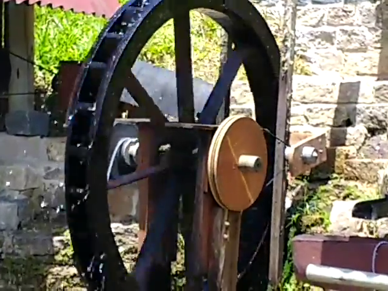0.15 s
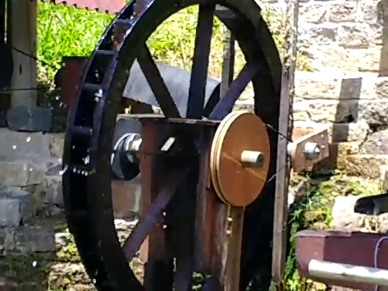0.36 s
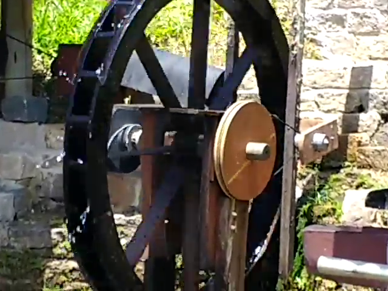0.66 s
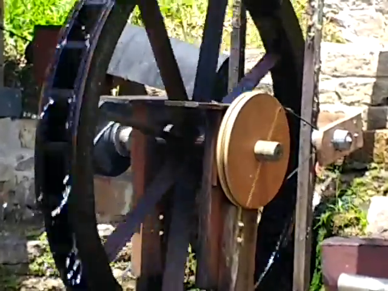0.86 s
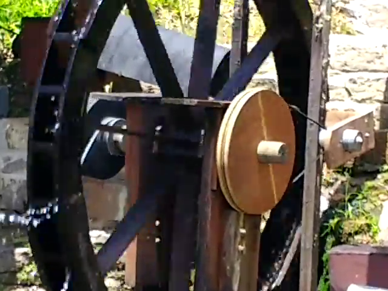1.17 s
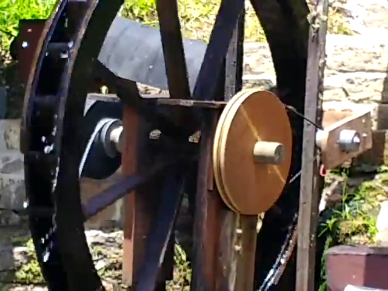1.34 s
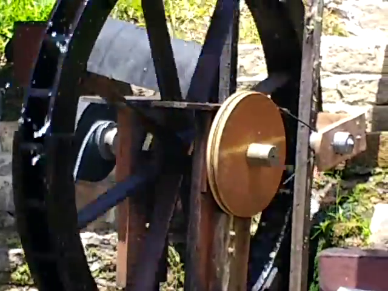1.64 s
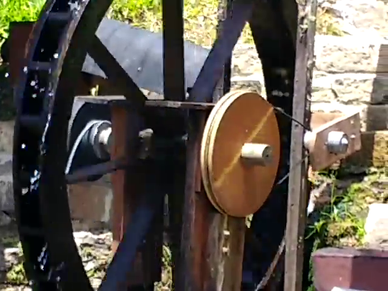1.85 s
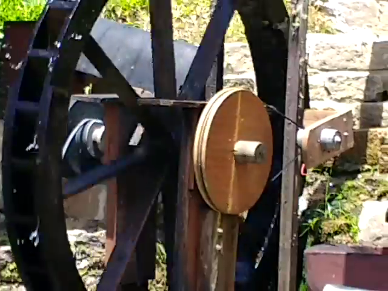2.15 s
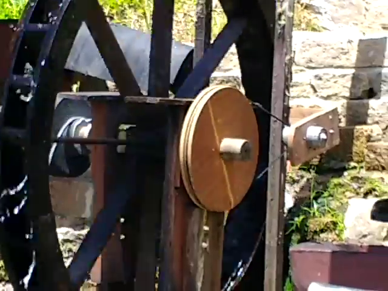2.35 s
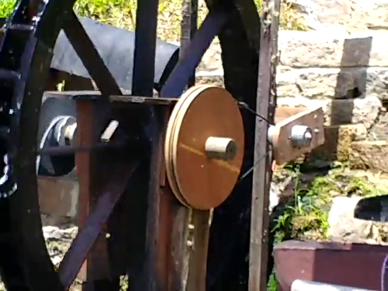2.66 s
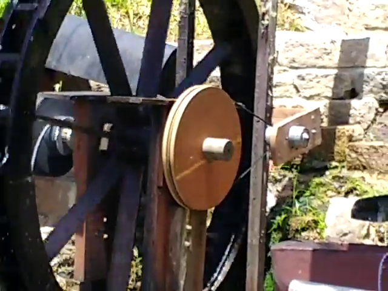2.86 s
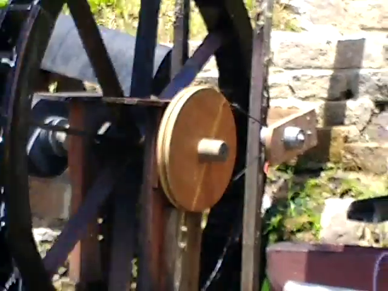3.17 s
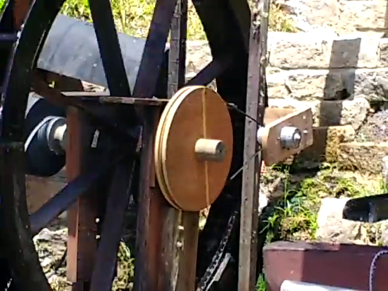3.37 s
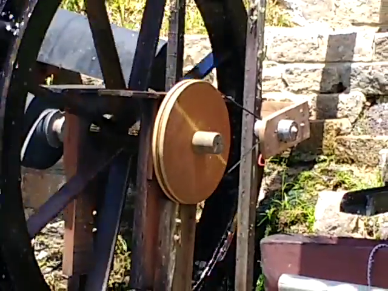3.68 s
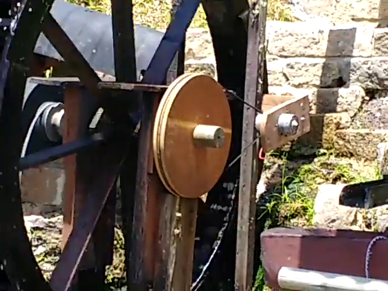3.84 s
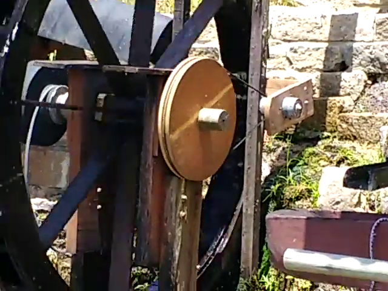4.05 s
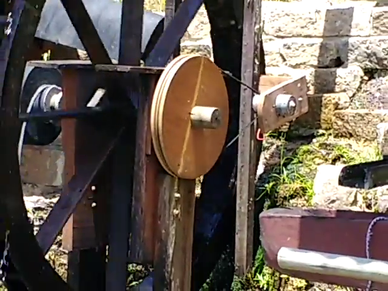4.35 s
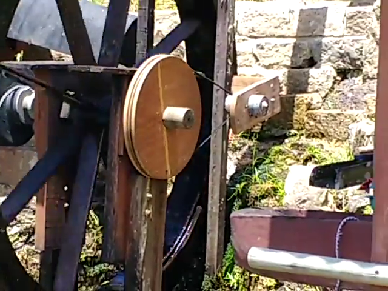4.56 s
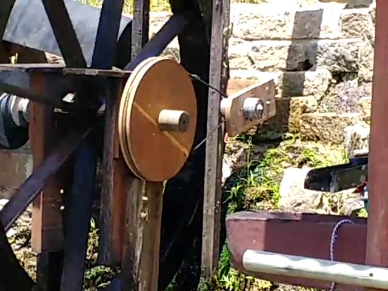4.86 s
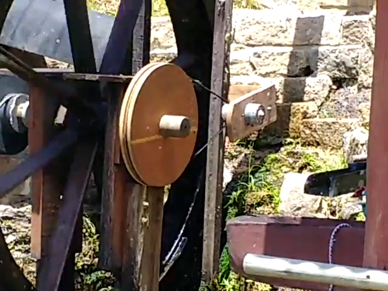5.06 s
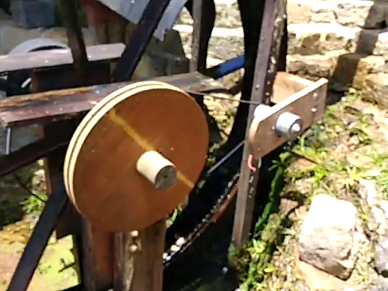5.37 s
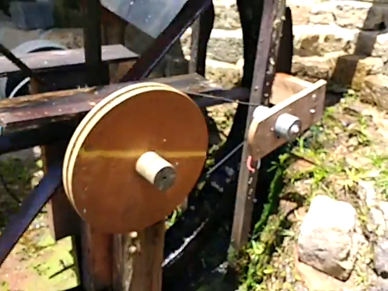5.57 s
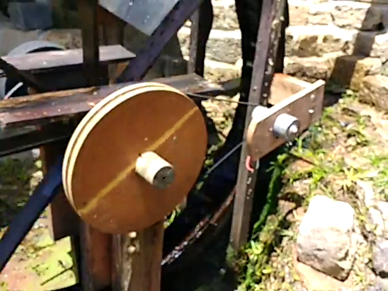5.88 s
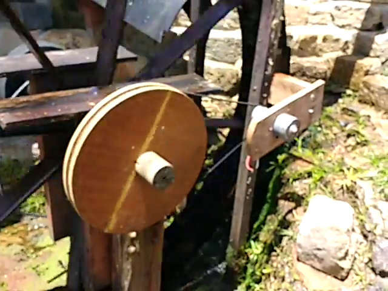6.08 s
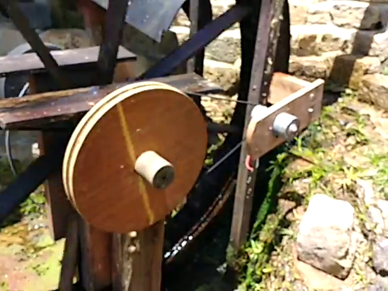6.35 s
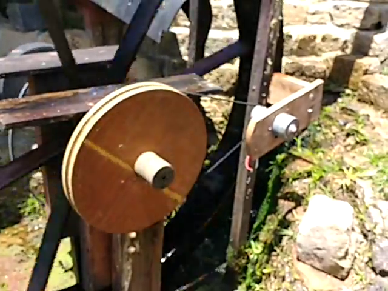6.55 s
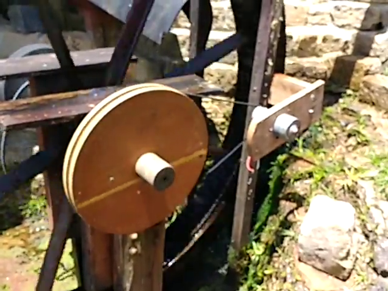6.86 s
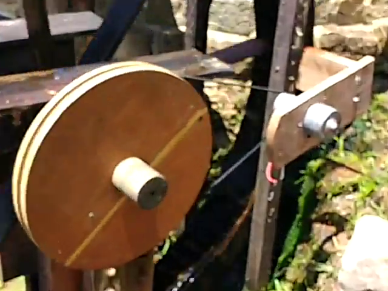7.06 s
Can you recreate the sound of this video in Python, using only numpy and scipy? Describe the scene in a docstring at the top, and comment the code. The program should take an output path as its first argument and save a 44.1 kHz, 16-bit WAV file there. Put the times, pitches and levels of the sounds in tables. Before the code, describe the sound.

Continuous falling water and quick bucket slaps, heard from very near on a phone in the open air. Each slap has a woody, hollow knock and a burst of droplets, some harder than others. Gurgles, fizz and sharp drips fill the gaps. Soft bassy wind bumps come in clusters, with calmer stretches between. A distant thin whistle passes near the middle, then the spray surges louder in the last seconds.

```python
"""Beside a stone wall, a small overshot waterwheel turns close to a phone held in the hand.
Buckets slap the water about thirteen times a second: noise and knocks ring each bucket and its trapped air.
Filtered noise and swarms of bubbles churn, spatter and fizz, the spray louder as the phone leans in.
Drops tick, larger bubbles ring, lumpy noise makes gusts at the ports, and a faint bird whistles in sines.
The phone subtracts its two microphone ports from each other, which widens the stereo."""
import sys
import numpy as np
from scipy import signal
from scipy.fft import rfft, irfft
from scipy.io import wavfile
from scipy.ndimage import uniform_filter1d

SR = 44100
rng = np.random.default_rng(int(sys.argv[2]) if len(sys.argv) > 2 else 0)


def wav_record(signal):
    """Record a signal, one row per channel, as 16-bit PCM in the file named by sys.argv[1]."""
    frames = np.transpose(np.atleast_2d(signal))
    bounded = np.clip(frames, -1, 1)
    # unit amplitude maps onto the largest positive 16-bit level
    quanta = np.round(bounded * 32767).astype(np.int16)
    wavfile.write(sys.argv[1], SR, quanta)


N = 318402
TIME = np.arange(N) / SR
FREQ = np.fft.rfftfreq(N, 1 / SR) + 1e-3  # the small offset avoids log(0)

# Table levels are starting points: the gains in the functions and the phone's subtraction come on top.


def undb(db):
    """Turn decibels into a gain."""
    return 10 ** (np.asarray(db) / 20)


def unit(x):
    """Scale to an rms (average strength) of 1."""
    return x / np.sqrt(np.mean(x ** 2))


def curve(rows):
    """Join (time, value) rows by straight lines."""
    return np.interp(TIME, *np.transpose(rows))


def colour(x, points):
    """Shape the spectrum through (frequency, level) points."""
    hz, db = np.transpose(points)
    gain_db = np.interp(np.log(FREQ), np.log(hz), db)
    return irfft(rfft(x) * undb(gain_db), N)


def ring(x, hz, width_hz):
    """Let x excite one resonance, with gain 1 at its centre."""
    return signal.lfilter(*signal.iirpeak(hz, hz / width_hz, SR), x)


def walk(rate):
    """Wander smoothly at random, with a spread near 1."""
    k = max(int(SR / rate), 1)
    steps = np.repeat(rng.standard_normal(N // k + 1), k)
    return 1.22 * uniform_filter1d(steps, k)[:N]


def add(out, s, x):
    """Mix x into out from time s on."""
    i = int(np.clip(s * SR, 0, N - 1))
    out[i:i + len(x)] += x[:N - i]


def patter(rate, spread_db):
    """Random impacts, rate per second: many small ones, a few large."""
    sizes = undb(spread_db * np.minimum(rng.exponential(size=N), 5))
    return (rng.random(N) < rate / SR) * sizes * rng.choice([-1, 1], N)


# colour of the splash that a bucket throws: (frequency [Hz], level [dB per Hz])
SPLASH_COLOUR = [(1200, -34), (1900, 9.5), (2350, 8), (2550, 0), (2800, 7), (3500, -3), (6000, -7.5),
                 (14000, -14)]
# the lip of a bucket cuts the water this long before the blow
ENTRY_S = .02


def buckets(slap_gain_db=4, splash_gain_db=3.5, note_gain_db=8, rise_s=0.0032, fall_s=0.018,
            hard_db=-36, softening=1.0):
    """Each bucket slaps, sounds a hollow note and throws droplets; weak slaps are more slosh than blow."""
    slaps, notes, burst = np.zeros((3, N))
    t = TIME[:SR // 7]
    for s, db, air_hz, thrown_db, hollow_db, rebound_db in landings():
        # a full bucket lands flat, so its first milliseconds stand out
        punch_db = np.clip(1.2 * (db + 39.5), 0, 4.5) * np.exp(-np.abs(t - ENTRY_S - .003) / .008)
        impact = slap(air_hz, softening * (hard_db - db), rebound_db)
        add(slaps, s - ENTRY_S, undb(db + punch_db) * impact)
        add(notes, s, undb(hollow_db) * hollow_note())
        add(burst, s, 2 * undb(thrown_db) * (1 - np.exp(-t / rise_s)) * np.exp(-t / fall_s))
    splash = unit(colour(patter(rate=3800, spread_db=2.0), SPLASH_COLOUR))
    return undb(slap_gain_db) * slaps + undb(note_gain_db) * notes + undb(splash_gain_db) * burst * splash


# the unbalanced wheel runs late (above 0) and early (below 0): (time [s], lag [s])
WHEEL_LAG_CURVE = [(0, 0.0075), (1.0, -0.016), (1.65, -0.0037), (2.5, 0.0042), (3.2, -0.0022),
                   (4.0, -0.0018), (4.45, 0.018), (5.15, .012), (5.6, -0.022), (6.1, -0.0055),
                   (7.2, -0.0017)]
# full buckets that land hard: (time [s], level [dB], pitch of the trapped air [Hz], splash level [dB],
# level of the hollow note [dB], rebound against the blow [dB])
FULL_BUCKETS = [(0.03, -42, 1160, -41, -56, -1), (0.098, -41.5, 1110, -37.5, -47.5, -1),
                (0.332, -39, 1190, -38, -48, -4), (0.41, -39, 1090, -43, -58, -12),
                (0.486, -38.5, 1280, -57, -54, -8), (0.64, -37.5, 1070, -40.5, -55, -12),
                (0.793, -40.5, 1210, -39, -54, -6), (1.107, -41, 1030, -43, -55, -12),
                (1.188, -41.5, 1080, -56, -63, -10), (1.269, -37.5, 1100, -44, -48, -11),
                (1.422, -37.5, 1026, -50, -62, -2), (1.496, -40.5, 1080, -36.5, -58, -2),
                (1.576, -36, 1007, -44, -63, -10), (1.654, -33.5, 1034, -40, -51, -2),
                (1.819, -40, 1110, -45, -66, -6), (1.9, -40.5, 1050, -45, -50.5, -5),
                (1.985, -38, 1070, -38, -63, -8), (2.294, -43, 1030, -40, -70, -6),
                (2.378, -37, 1105, -45, -53, -6), (2.533, -44, 990, -41.5, -69, -1),
                (2.613, -39.5, 1020, -42.5, -62, -6), (2.688, -39.5, 1117, -44, -48.5, -5),
                (2.766, -39.5, 980, -43, -54, -6), (2.845, -38, 1056, -40, -51, -17),
                (3.074, -36.5, 1097, -39, -47, -6), (3.228, -34, 1390, -50, -42.5, -14),
                (3.386, -41.5, 1165, -41, -48, 0), (3.467, -41, 1085, -44, -56, -9),
                (3.544, -40, 1130, -44, -54, -5), (3.625, -36, 1210, -53, -66, -4),
                (3.779, -40, 1084, -42, -52, -12), (3.858, -42.5, 1080, -42, -66, -2),
                (3.937, -40, 1090, -42.5, -62, -9), (4.015, -34, 1310, -57, -61, -11),
                (4.099, -39.5, 1010, -42.5, -44.5, -8), (4.18, -36.5, 1090, -54, -45.5, 1),
                (4.266, -37, 1014, -40, -68, -14), (4.425, -40, 950, -43.5, -55, -11),
                (4.659, -41, 1010, -44, -66, 0), (4.814, -37, 1050, -44, -47, -3),
                (4.973, -40, 1070, -42, -68, -9), (5.201, -37.5, 1057, -44, -61, -7),
                (5.562, -39, 1120, -37.5, -45.5, -9), (5.643, -39.5, 1190, -61, -51, -12),
                (5.718, -41, 980, -53, -44.5, -8), (5.799, -41, 1017, -46, -45, -4),
                (5.883, -40, 1000, -38, -43.5, -9), (5.964, -40, 1110, -43, -59, -5),
                (6.05, -39.5, 1050, -40, -42.5, -3), (6.125, -45, 1000, -45, -48.5, -4),
                (6.751, -42, 1090, -48, -47, 0), (6.906, -34.5, 1155, -41, -48, -12),
                (6.981, -33, 1100, -37.5, -58, -8), (7.054, -42, 1140, -38.5, -63, 0),
                (7.135, -39.5, 1060, -44, -50, -10)]
BUCKETS_PER_S, FIRST_BUCKET_S = 12.772, 0.021  # before the lag
# ordinary buckets: typical values and their random scatter
SLAP_DB, SLAP_SCATTER_DB = -45.5, 0.5
AIR_HZ, AIR_SCATTER_OCTAVES = 1143, 0.18
SPLASH_DB, SPLASH_SCATTER_DB = -44, 2.5
HOLLOW_DB, REBOUND_DB = -55, -2


def landings():
    """The turning wheel times the light buckets and chance sets their strength; full ones are listed."""
    even = np.arange(FIRST_BUCKET_S, N / SR, 1 / BUCKETS_PER_S)
    times = even + np.interp(even, *np.transpose(WHEEL_LAG_CURVE))
    fill, pocket, throw = rng.standard_normal((len(times), 3)).T
    level_db = SLAP_DB + SLAP_SCATTER_DB * fill
    air_hz = AIR_HZ * 2 ** (AIR_SCATTER_OCTAVES * pocket)
    thrown_db = SPLASH_DB + SPLASH_SCATTER_DB * throw
    hollow_db, rebound_db = np.full(len(times), HOLLOW_DB), np.full(len(times), REBOUND_DB)
    rows = np.transpose([times, level_db, air_hz, thrown_db, hollow_db, rebound_db])
    # a full bucket takes the place of a light one at the same moment
    full_times = np.transpose(FULL_BUCKETS)[0]
    light = [row for row in rows if np.abs(full_times - row[0]).min() > .5 / BUCKETS_PER_S]
    return light + list(FULL_BUCKETS)


# what a wet bucket rings with: (frequency [Hz], width [Hz], level [dB])
BUCKET_RINGS = [(485.5, 50, -8.5), (1109, 87, -5.5), (1398, 180, -6.5), (1620, 170, -26)]


def slap(air_hz, soft_db, rebound_db, air_width_hz=200, entry_s=0.017, collapse_s=0.018, slosh_s=0.025,
         entry_db=-32, collapse_db=-21, slosh_db=-31, land_db=-22, land_s=.002, rebound_s=.01,
         bucket_db=1.5, contact_s=0.00075, detune=0.027, pocket_db=-3, pocket_cycles=24, pocket_glide=.06):
    """Hiss, blow, rebound and collapsing water ring bucket and air; rms 1 over 20 ms from the blow."""
    t, blow = TIME[:SR // 7] - ENTRY_S, int(ENTRY_S * SR)
    tail, pitch, late, rise = rng.standard_normal(4)
    # the lip hisses in, then the water collapses raggedly
    before = undb(entry_db) * np.exp(-np.abs(t) / entry_s)
    after = undb(collapse_db) * np.exp(-np.abs(t) / collapse_s)
    after += undb(slosh_db) * np.exp(-np.abs(t) / (slosh_s * 1.9 ** tail))
    lumps = np.repeat(rng.exponential(size=len(t) // 200 + 1), 200)
    ragged = uniform_filter1d(lumps, 60)[:len(t)] ** .7
    # the water meets the bucket over a few milliseconds
    landing = undb(land_db) * np.exp(-(t / land_s) ** 2)
    push = rng.standard_normal(len(t)) * (landing + ragged * np.where(t < 0, before, after))
    # the blow pushes and rebounds, so it holds little bass
    hits = np.zeros(len(t))
    hits[blow] = 1
    hits[blow + int(rebound_s * SR * 1.12 ** late)] = undb(rebound_db)
    push += undb(-soft_db) * ring(hits, air_hz, 1 / contact_s)
    air = ring(ring(push, air_hz, air_width_hz), air_hz, 6.1 * air_width_hz)
    # the water left in a bucket shifts its pitch
    shift = 1 + detune * pitch
    body = sum(undb(db) * ring(ring(push, shift * hz, width), shift * hz, 5 * width)
               for hz, width, db in BUCKET_RINGS)
    sound = air + undb(bucket_db) * body

    def loudness(x):
        """Rms over 20 ms from the blow."""
        return np.sqrt(np.mean(x[blow:blow + SR // 50] ** 2))

    # the pocket closes into one large bubble, which rings on in step with the blow and bends in pitch
    pocket = bubble(air_hz, pocket_cycles, pocket_glide * rise)
    add(sound, ENTRY_S + .75 / air_hz, 3.5 * undb(pocket_db) * loudness(sound) * pocket)
    return sound / loudness(sound)


HOLLOW_HZ, HOLLOW_S = 489, 0.022  # typical pitch, and decay time


def hollow_note(swell_s=0.0028, detune=.035, bend=0.039):
    """The low note of an emptied bucket swells after the blow and bends as the water in it shifts."""
    t = TIME[:SR // 7]
    pitch, turn = rng.standard_normal(2)
    hz = HOLLOW_HZ * (1 + detune * pitch + bend * turn * (1 - np.exp(-t / HOLLOW_S)))
    level = (1 - np.exp(-t / swell_s)) * np.exp(-t / HOLLOW_S)
    return level * np.sin(2 * np.pi * np.cumsum(hz) / SR)


# colour of the falling water: (frequency [Hz], level [dB per Hz])
WATER_COLOUR = [(60, 3), (200, -9), (370, -16.5), (480, -5.5), (620, -6), (800, -9.5), (1100, -4.5),
                (1700, 1.5), (2500, 0.5), (3300, -0.5), (3700, -5.5), (4200, 0), (5200, 3.5), (6800, 1.5),
                (9000, -6.5), (15000, -12)]
# level of the churning water under the wheel: (time [s], level [dB])
CHURN_LEVEL = [(0, -42), (.34, -41), (.88, -45.5), (1.28, -39.5), (1.66, -43.5), (2.27, -41.5),
               (2.45, -43.5), (2.71, -42), (2.81, -45.5), (3.27, -42.5), (3.37, -40), (4.39, -42.5),
               (4.75, -43.5), (4.93, -41), (5.12, -44), (5.3, -42.5), (5.57, -48.5), (5.71, -38),
               (6.07, -40.5), (6.37, -42.5), (6.51, -51.5), (6.64, -41), (7.2, -40.5)]
# level of the spray, which surges and grows once the phone leans in: (time [s], level [dB])
SPRAY_LEVEL = [(0.0, -37), (0.16, -43.5), (0.22, -37.0), (0.58, -40), (0.88, -38), (0.94, -41.5),
               (1.04, -41.5), (1.08, -34), (1.28, -37.5), (1.36, -38.5), (1.42, -37), (1.48, -38.5),
               (1.62, -38), (1.82, -37.5), (1.86, -44), (2.06, -35), (2.1, -42), (2.23, -39), (2.45, -40.5),
               (2.55, -36.5), (2.87, -42.5), (2.91, -36.5), (3.21, -42.5), (3.31, -40.5), (3.39, -34.5),
               (3.55, -38.5), (3.81, -40.5), (3.87, -38), (3.95, -41.5), (4.05, -35.5), (4.15, -42),
               (4.29, -38), (4.37, -38.5), (4.49, -36.5), (4.71, -43), (4.85, -36.5), (5.11, -42),
               (5.25, -37.5), (5.53, -38), (5.71, -33), (5.89, -32), (6.01, -36.5), (6.09, -28.5),
               (6.15, -38), (6.29, -33.5), (6.59, -38), (6.7, -32.5), (6.82, -36.5), (7.14, -31),
               (7.2, -34.5)]


def spill(churn_db=-1, spray_db=-1.5, drop_share_db=1, fizz_db=-8, gurgle_db=-5, glug_db=-14,
          lumpy=0.42, lumpy_together=0.11, split_hz=3000):
    """Falling water: noise and bubbles churn and gurgle low down, and spray and fizz higher up."""
    drops = unit(patter(rate=3000, spread_db=3.5))
    water = rfft(colour(rng.standard_normal(N) + undb(drop_share_db) * drops, WATER_COLOUR))
    # six overlapping octave bands, each with its own run of small splashes
    octave = np.clip(np.log2(FREQ / 500), 0, 5)
    lumps = np.zeros(N)
    for k in range(6):
        band = irfft(water * np.maximum(1 - np.abs(octave - k), 0), N)
        lumps += band * (1 - lumpy + lumpy * splats(rate=170, fall_s=0.01))
    low = irfft(rfft(lumps) / (1 + (FREQ / split_hz) ** 4), N)
    churn_level = curve(CHURN_LEVEL)
    churn = undb(churn_db + churn_level) * unit(low)
    gurgle = undb(gurgle_db + churn_level) * bubbles(
        count=600, low_hz=1302, high_hz=3487, cycles=23.7, spread_db=2.5, glide=0.057)
    gurgle += undb(glug_db + churn_level) * bubbles(
        count=200, low_hz=559.5, high_hz=1402, cycles=18.6, spread_db=2.5, glide=0.118)
    spray = unit(lumps - low) + undb(fizz_db) * bubbles(
        count=3000, low_hz=2414, high_hz=7940, cycles=32.0, spread_db=4.5, glide=0.032)
    # churn and spray also swell a little together
    together = 1 - lumpy_together + lumpy_together * splats(rate=90, fall_s=0.013)
    return (churn + undb(spray_db + curve(SPRAY_LEVEL)) * spray) * together + gurgle


def splats(rate, fall_s):
    """Level of a run of small splashes: each starts at once and dies away; mean 1."""
    hits = (rng.random(N) < rate / SR) * rng.exponential(size=N)
    swell = signal.lfilter([1], [1, -np.exp(-1 / (fall_s * SR))], hits)
    return swell / swell.mean()


def bubbles(count, low_hz, high_hz, cycles, spread_db, glide):
    """A swarm of bubbles of all sizes, mostly faint, each with its own rise in pitch; rms 1."""
    out = np.zeros(N)
    for when, size, strength, life, rise in rng.random((count, 5)):
        loud = undb(spread_db * min(-np.log(1 - strength), 4))
        hz = low_hz * (high_hz / low_hz) ** size
        add(out, when * N / SR, loud * bubble(hz, cycles * (.5 + life), 2 * glide * rise))
    return unit(out)


def bubble(hz, cycles, glide=0.019):
    """A bubble rings down over some cycles; with glide above 0 it rises in pitch, as near the surface."""
    age = np.arange(int(2 * cycles * SR / hz)) * hz / SR / cycles
    return np.exp(-3 * age) * np.sin(2 * np.pi * cycles * age * (1 + glide * age))


# single drops that land near the phone: (time [s], peak level [dB], frequency [Hz])
NEAR_DROPS = [(1.654, -15, 2700), (2.094, -20.5, 2400), (2.145, -24.5, 6500), (2.379, -16, 2860),
              (2.521, -19.5, 2600), (2.533, -23.5, 4630), (2.908, -18.5, 4900), (2.924, -23, 4800),
              (3.011, -19, 6130), (3.556, -24, 6500), (4.102, -15.5, 4400), (4.333, -15, 5900),
              (4.482, -20, 5070), (4.606, -17, 4240), (4.831, -20.5, 6300), (5.243, -24, 4520),
              (5.299, -18, 4000), (6.107, -17, 4400), (6.206, -23, 4600), (6.295, -15, 4050),
              (6.33, -18, 2600), (6.442, -17, 3240), (6.443, -13.5, 6900), (7.133, -18, 6800)]
# large bubbles that ring out: (time [s], level [dB], starting pitch [Hz],
# pitch glide [share, half the rise after one ring time], ring time [s, to fall 26 dB])
LARGE_BUBBLES = [(0.314, -36, 340, .4, 0.024), (0.567, -28, 2630, 0.034, 0.017),
                 (0.994, -23, 2315, 0.016, 0.018), (1.136, -34, 330, .05, 0.024),
                 (1.193, -25, 2190, .02, .021), (1.345, -31, 716, .03, .021), (1.366, -35, 640, .03, 0.025),
                 (1.401, -31, 693, .02, 0.019), (1.662, -18, 2410, .01, .016),
                 (1.738, -21.5, 2670, .01, 0.012), (1.747, -20.5, 2500, .01, 0.01),
                 (2.492, -30.5, 910, .01, 0.038), (2.712, -25, 2770, 0.028, 0.021),
                 (2.869, -26, 2290, .02, .015), (3.129, -40, 760, .1, 0.033), (3.49, -30, 637, .02, 0.018),
                 (3.868, -26, 2300, 0.023, .014), (4.742, -27, 2300, .02, 0.016),
                 (4.886, -21.5, 2880, 0.024, 0.02), (4.97, -25, 2760, 0.022, .014),
                 (5.293, -35.5, 790, .04, .03), (5.485, -40, 720, .35, 0.022),
                 (5.677, -29, 2550, 0.14, 0.03), (5.828, -35, 826, .02, 0.033),
                 (6.13, -29, 2414, .01, 0.019), (6.167, -34.5, 880, 0.055, .016),
                 (6.328, -19.5, 2950, 0.011, 0.015)]


def near_drops(drop_gain_db=0, decay_s=0.0016, width_share=0.27, plop_gain_db=1, swell_s=0.00088):
    """Drops tick on wood and stone as short noise through a resonance; large bubbles ring."""
    out, t = np.zeros(N), TIME[:SR // 60]
    for s, db, hz in NEAR_DROPS:
        tick = ring(rng.standard_normal(len(t)) * np.exp(-t / decay_s), hz, width_share * hz)
        add(out, s, undb(db + drop_gain_db) * tick / np.abs(tick).max())
    for s, db, hz, glide, ring_s in LARGE_BUBBLES:
        plop = bubble(hz, ring_s * hz, glide)
        swell = 1 - np.exp(-TIME[:len(plop)] / swell_s)
        add(out, s, undb(db + plop_gain_db) * plop * swell)
    return out


# colour of the wind rumble: (frequency [Hz], level [dB per Hz])
RUMBLE_COLOUR = [(20, -10), (50, -7), (80, 3.5), (120, 5), (190, -2.5), (290, -14.5), (400, -22.5),
                 (600, -47), (1500, -78)]
# the largest eddies, which thump the port: (time [s], peak level [dB], frequency [Hz])
LARGE_EDDIES = [(0.068, -22, 126), (0.139, -21, 130), (0.174, -21, 140), (0.187, -17, 125),
                (0.203, -21.5, 210), (0.273, -15, 135), (0.28, -15, 196), (0.351, -21, 160),
                (0.359, -13, 150), (0.365, -17.5, 215), (0.526, -20, 121), (0.763, -18, 127),
                (0.863, -25, 184), (1.377, -26.5, 104), (1.848, -26.5, 156), (2.044, -23, 140),
                (2.094, -24.5, 189), (2.188, -19, 151.5), (3.399, -28, 116), (3.508, -26, 108),
                (3.676, -25, 195), (3.694, -20, 129), (3.751, -13.5, 137), (3.782, -22, 170),
                (3.835, -23.5, 104), (3.86, -12.5, 187), (3.886, -27, 150), (3.953, -15, 132),
                (3.972, -21, 130), (4.129, -23.5, 144), (4.158, -21, 109), (4.169, -17, 188),
                (4.286, -27, 128), (4.804, -21, 135), (4.918, -21, 114), (4.956, -17.5, 142),
                (5.025, -20.5, 129), (5.09, -17.5, 184), (5.105, -17, 135), (5.127, -24, 170),
                (5.142, -17, 140), (5.629, -25.5, 146), (5.803, -15, 143), (5.838, -23, 125),
                (5.903, -18, 190), (5.925, -21, 150), (5.939, -24, 144), (5.97, -10, 205), (6.05, -16, 119),
                (6.096, -17.5, 125), (6.111, -15.5, 164), (6.342, -19.5, 152), (6.628, -15.5, 150),
                (6.785, -22.5, 227), (6.974, -20, 153), (7.004, -20, 150), (7.012, -16, 180),
                (7.028, -23, 240), (7.055, -16, 145), (7.182, -26.5, 122)]


def wind(wind_db=-1.0, flutter_db=4.0, smooth_db=-6, eddy_gain_db=1.5, eddy_cycles=0.52,
         edge_db=-15, edge_ratio=1.86):
    """Small eddies crowd into a lumpy rumble; large ones swing the pressure, with a knocking edge."""
    turbulence = unit(patter(rate=260, spread_db=2.0)) + undb(smooth_db) * rng.standard_normal(N)
    out = gusts() * undb(wind_db + flutter_db * walk(45)) * unit(colour(turbulence, RUMBLE_COLOUR))
    t = TIME[:SR // 20] - 1 / 40  # centred on the eddy

    def swing(hz, phase):
        """A wave that swings only once or twice."""
        return np.exp(-(t * hz / eddy_cycles) ** 2) * np.cos(2 * np.pi * (hz * t + phase))

    for (s, db, hz), phase in zip(LARGE_EDDIES, rng.random(len(LARGE_EDDIES))):
        thump = swing(hz, phase) + undb(edge_db) * swing(edge_ratio * hz, phase)
        add(out, s + t[0], undb(db + eddy_gain_db) * thump)
    return out


# gusts, over a light breeze: (time of the peak [s], length [s], level [dB])
GUST_LIST = [(0.176, 0.18, -30.5), (0.377, 0.16, -24.5), (0.545, .073, -32), (.81, 0.32, -30.5),
             (1.368, 0.042, -38), (2.068, 0.36, -35.5), (2.402, 0.15, -38.5), (3.52, .2, -57),
             (3.795, 0.46, -35.5), (4.175, 0.065, -27.5), (4.366, 0.21, -37.5), (4.68, 0.18, -48),
             (4.99, 0.4, -36.5), (5.142, .19, -23), (5.635, 0.056, -36), (5.94, 0.24, -28),
             (6.31, 0.33, -34.5), (6.682, 0.43, -33), (7.022, 0.11, -21.5)]
BREEZE_DB = -53.5


def gusts():
    """Strength of the wind: each gust swells and fades in a bell shape over the breeze."""
    strength = undb(BREEZE_DB)
    for s, length_s, db in GUST_LIST:
        strength = strength + undb(db) * np.exp(-(2 * (TIME - s) / length_s) ** 2)
    return strength


# a faint bird, one list of rows per whistle: (time [s], pitch [Hz], level [dB])
BIRD_WHISTLES = [
    [(2.735, 3950, -57), (2.755, 4330, -53), (2.778, 4620, -47), (2.80, 4400, -53), (2.825, 3650, -48),
     (2.87, 3400, -54), (2.90, 3400, -57)],
    [(3.55, 3680, -67), (3.58, 3550, -70), (3.64, 3200, -55), (3.68, 3050, -68)],
]


def bird(bird_gain_db=8, waver=0.0029):
    """Thin, nearly pure whistles from far off: sine waves with a slightly wavering pitch."""
    out = np.zeros(N)
    for whistle in BIRD_WHISTLES:
        s, hz, db = np.transpose(whistle)
        pitch = np.interp(TIME, s, hz) * (1 + waver * walk(200))
        sounding = (TIME > s[0]) * (TIME < s[-1])
        level = sounding * undb(bird_gain_db + np.interp(TIME, s, db))
        out += level * np.sin(2 * np.pi * np.cumsum(pitch) / SR)
    return out


def stonework(water, wall_s, count=14):
    """Echoes scattered by the wall; their pattern keeps changing as the splashes and the phone move."""
    t = TIME[:SR // 8]
    out = np.zeros(N)
    for k in range(count):
        scatter = rng.standard_normal(len(t)) * np.exp(-t / wall_s)
        # each pattern fades into the next
        share = np.maximum(1 - np.abs(np.linspace(0, count - 1, N) - k), 0)
        out += np.sqrt(share) * signal.oaconvolve(water, scatter / np.linalg.norm(scatter))[:N]
    return out


# share of the sound that bends round to the shaded port: (frequency [Hz], level [dB])
BEND_COLOUR = [(450, -3.5), (800, -16.5), (1050, -60), (1400, -10.5), (2200, -82), (6000, -62)]
# colour of the echoes from the stonework: (frequency [Hz], level [dB])
STONE_COLOUR = [(500, 0.5), (2500, 2), (6500, -0.5), (11000, 4)]


def scene(wall_db=-10, wall_s=0.0099, lee_wind_db=-19):
    """Pressure at the two ports: one faces wheel and wind, the other lies in the phone's shadow."""
    water = buckets() + spill() + near_drops() + bird()
    # long waves bend round to the shaded port; short ones reach it mostly scattered from the stonework
    echoes = colour(stonework(water, wall_s), STONE_COLOUR)
    shaded = colour(water, BEND_COLOUR) + undb(wall_db) * echoes
    return np.array([shaded + undb(lee_wind_db) * wind(), water + wind()])


# bands where the phone eases its subtraction: (frequency [Hz], width [Hz], average share eased [0 to 1])
EASED_BANDS = [(786, 190, 0.16), (1705, 400, 0.54), (2720, 310, 0.19)]
PORT_LAG_S = .0005605  # travel time between the ports
TOP_HZ = 15500


def record(dry, ease_wander=0.34):
    """Each channel is its own port minus the other one, delayed by the travel time; the top is cut."""
    other = rfft(dry[::-1]) * np.exp(-2j * np.pi * FREQ * PORT_LAG_S)
    # in the eased bands some of the subtracted sound is put back, by an amount that wanders
    eased = sum(share * np.exp(-((FREQ - hz) / width_hz) ** 2) for hz, width_hz, share in EASED_BANDS)
    fill = np.clip(1 + ease_wander * walk(14), 0, 2) * irfft(other * eased, N)
    stereo = dry - irfft(other, N) + fill
    top_cut = signal.ellip(12, .1, 80, TOP_HZ, fs=SR, output="sos")
    return signal.sosfilt(top_cut, stereo)


dry = scene()
out = record(dry)
wav_record(out)
```